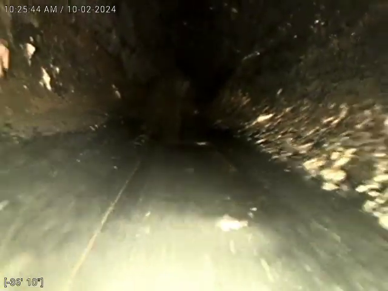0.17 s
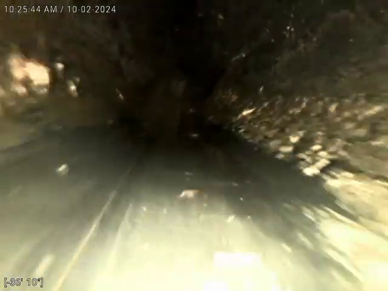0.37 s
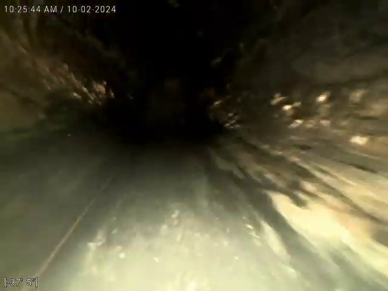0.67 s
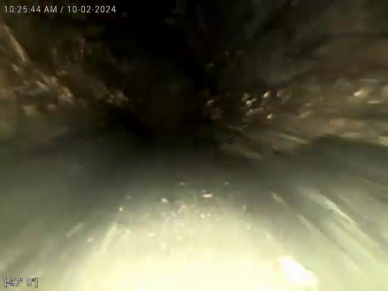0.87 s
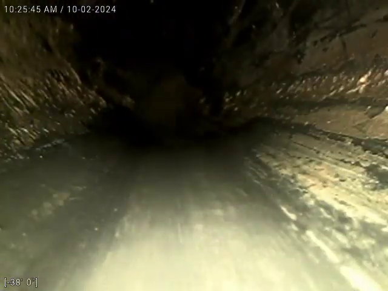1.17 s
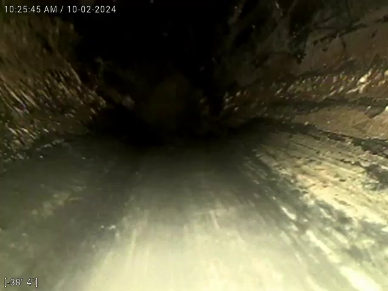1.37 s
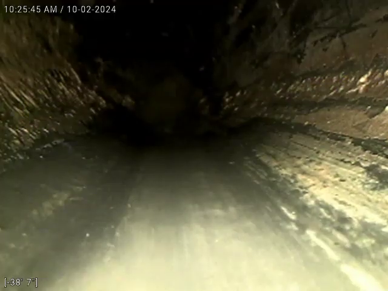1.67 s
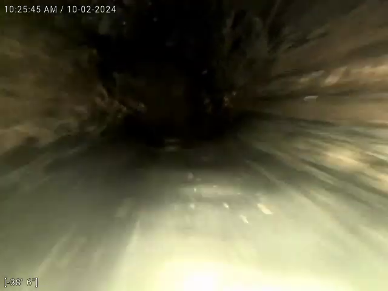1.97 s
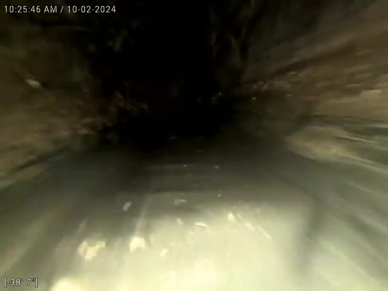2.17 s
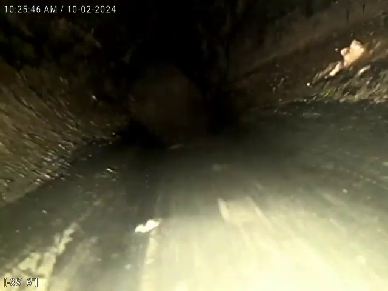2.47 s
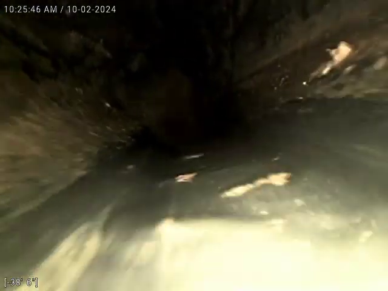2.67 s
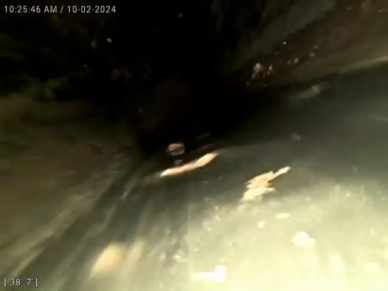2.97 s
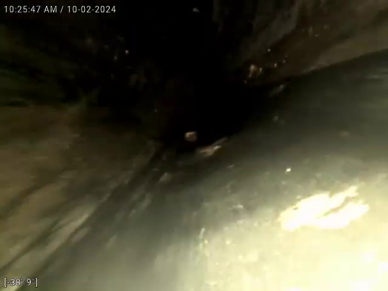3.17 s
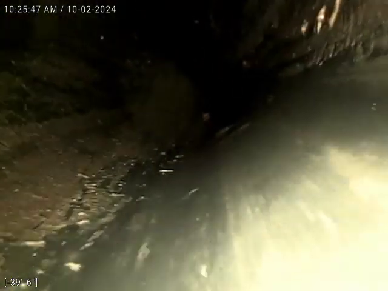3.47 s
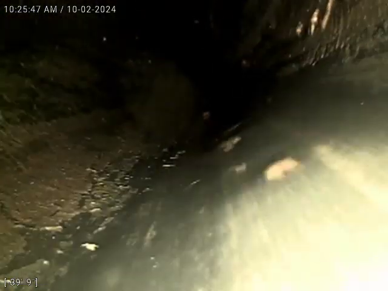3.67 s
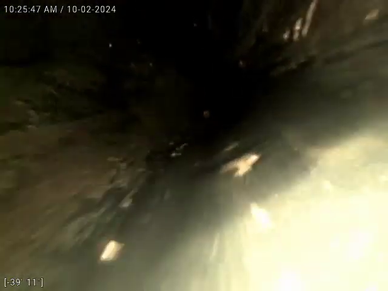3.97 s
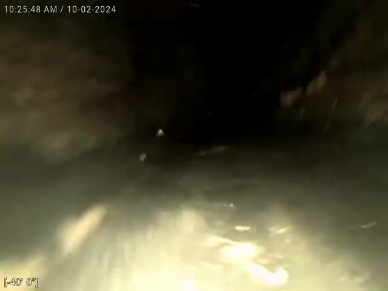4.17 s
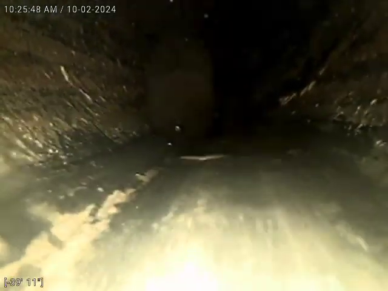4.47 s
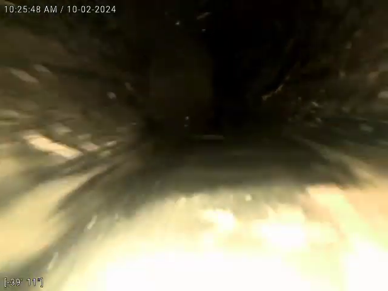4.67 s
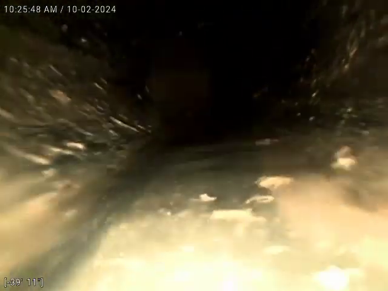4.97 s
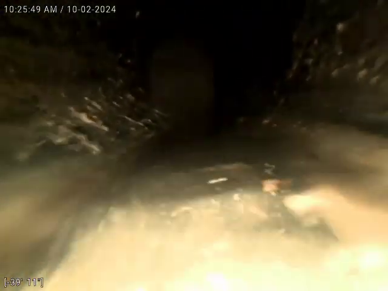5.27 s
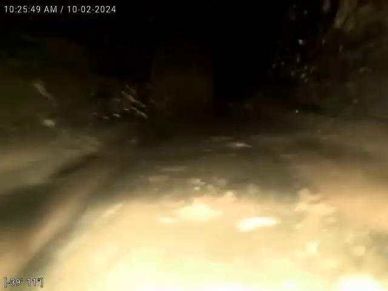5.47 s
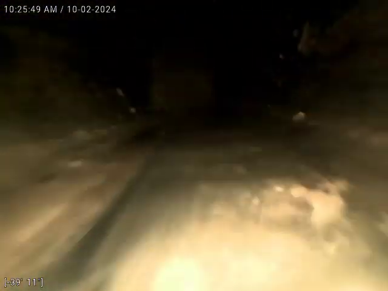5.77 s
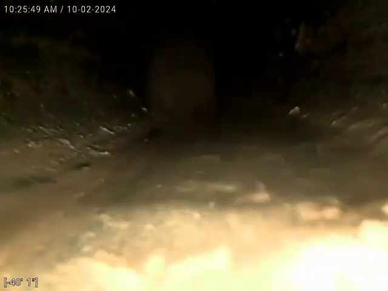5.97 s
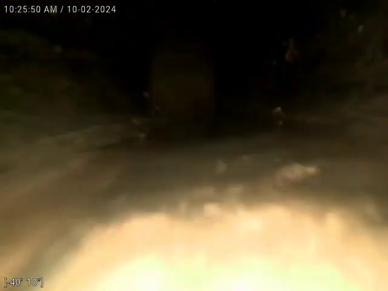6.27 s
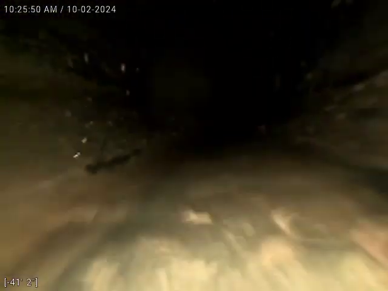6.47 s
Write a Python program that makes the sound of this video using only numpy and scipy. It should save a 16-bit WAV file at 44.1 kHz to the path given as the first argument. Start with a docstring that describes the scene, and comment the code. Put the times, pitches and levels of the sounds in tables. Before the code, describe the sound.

Heard very close and dry, cable coils rasp, tick and rumble against a hollow frame. The opening shove includes a distorted bang; a shorter shove ends in a dull knock. After smooth, breathy friction and a quick swish, grinding clatter bursts out and a long scrape with bright ticks follows. Another soft slide, a thump and short swishes give way to a final scraping push with scattered knocks, over low background hiss and hum.

```python
"""Stiff cable shoved off its reel

A stiff push cable is fed off its reel and down a drain in repeated shoves, close to one microphone.
Modulated noise makes it rasp and tick in its guide; damped modes make its coils grind and knock on the
hollow reel frame, overloading the input. Mostly between shoves, shaped noise slides with a soft hiss and
a bright swish, most likely a hand taking a new grip. Steady hiss and a faint hum lie beneath."""
import sys
import numpy as np
from scipy import signal
from scipy.fft import rfft, irfft, next_fast_len
from scipy.io import wavfile
from scipy.ndimage import map_coordinates

SR = 44100
rng = np.random.default_rng(int(sys.argv[2]) if len(sys.argv) > 2 else 0)


def materialize(psi):
    """Save the field psi as 16-bit PCM at rate SR to the path in sys.argv[1].

    A 1-D psi becomes a single channel; in a 2-D psi each row is a channel.
    """
    bounded = np.clip(np.atleast_2d(psi).T, -1, 1)
    quanta = np.round(bounded * 32767).astype(np.int16)
    wavfile.write(sys.argv[1], SR, quanta)


N = 291942


def amp(db):
    """Level to amplitude: 20 dB is a factor of ten."""
    return 10 ** (np.asarray(db) / 20)


def unit(x):
    """Power normalization: scale to rms 1."""
    return x / np.sqrt(np.mean(x ** 2) + 1e-20)


def clock():
    """Uniform sampling: the time of every sample in seconds."""
    return np.arange(N) / SR


def gain_at(points, hz):
    """Spectral envelope: interpolate (f/Hz, level/dB) over log frequency, -80 dB below the first point."""
    f, db = np.transpose(points)
    return amp(np.interp(np.log(hz + 1), np.log(f), db, left=-80))


def wobble(rate):
    """Slow random modulation: a smooth curve through rate random knots a second."""
    knots = rng.standard_normal(int(N * rate / SR) + 4)
    return map_coordinates(knots, [clock() * rate])


def filtered(x, response):
    """Linear filtering: multiply the spectrum by a response of frequency."""
    m = next_fast_len(N + SR // 2)
    return irfft(rfft(x, m) * response(np.fft.rfftfreq(m, 1 / SR)), m)[:N]


def band(x, low_hz, high_hz):
    """Band-pass filtering: keep the part of x between two edges."""
    sections = signal.butter(2, [low_hz, high_hz], "bandpass", fs=SR, output="sos")
    return signal.sosfilt(sections, x)


def coloured(x, spectrum):
    """Spectral shaping: x through a spectral envelope, at rms 1."""
    return unit(filtered(x, lambda hz: gain_at(spectrum, hz)))


def friction(rough_db, rate):
    """Stick-slip friction: noise whose strength varies as tiny contacts catch and let go."""
    return unit(rng.standard_normal(N) * amp(rough_db * wobble(rate)))


def shifting(x, patchy_db, centre_hz=None, whistle_db=0):
    """Time-varying filtering: a contact's colour drifts in patches, and one resonance may glide."""
    hz, t, z = signal.stft(x, SR, nperseg=512)
    patch = np.outer(np.hanning(11), np.hanning(25))  # frequency by time
    field = unit(signal.fftconvolve(rng.standard_normal(z.shape), patch, "same"))
    db = patchy_db * field
    if centre_hz is not None:
        offset_hz = hz[:, None] - np.interp(t, *centre_hz)
        db = db + whistle_db * np.exp(-(offset_hz / 650) ** 2)
    return signal.istft(z * amp(db), nperseg=512)[1][:N]


def catches(per_s, spread_db):
    """Random point process: single impulses at random moments, of random size."""
    size_db = spread_db * np.clip(rng.standard_normal(N), -2, 1)
    return (rng.random(N) < per_s / SR) * amp(size_db)


def progress(start, end):
    """Stroke kinematics: the elapsed share of a stroke, 0 to 1, at every sample."""
    return np.clip((clock() - start) / (end - start), 0, 1)


def held(start, end, attack_s, release_s):
    """Contact envelope: linear attack, hold and linear release of a sliding contact."""
    t = clock()
    return np.clip((t - start) / attack_s, 0, 1) * np.clip((end - t) / release_s, 0, 1)


def add(track, s, sound):
    """Superposition: mix a sound in at time s."""
    part = track[max(round(s * SR), 0):][:len(sound)]
    part += sound[:len(part)]


# steady background hiss: f/Hz, relative level per Hz/dB
HISS_SPECTRUM = [(20, -17), (45, -16), (65, -8.5), (130, -7.5), (210, -13.5), (300, -15), (600, -15.5),
                 (1000, -22.5), (2000, -25), (3200, -22.5), (5400, -23), (7400, -30.5), (11000, -34),
                 (15800, -34)]
# faint hum partials: f/Hz, relative rms level/dB
HUM_PARTIALS = [(64.6, -69), (113.0, -51.5), (193.8, -57.5), (290.7, -59.5), (387.6, -57), (667.5, -60.5)]


def floor():
    """Stationary background: shaped noise plus sine partials with slightly wandering phase."""
    hum = np.zeros(N)
    for hz, db in HUM_PARTIALS:
        phase = 2 * np.pi * hz * clock() + 0.23 * wobble(2.52)
        hum += amp(db) * np.sqrt(2) * np.sin(phase)
    hiss = coloured(rng.standard_normal(N), HISS_SPECTRUM)
    return amp(-45.5) * hiss + amp(-4.0) * hum


# slow slides: start t/s, end t/s, hiss level/dB, fine fizz level/dB, share of the stroke pressed hardest/1
SLIDE_STROKES = [(1.117, 1.612, -34.5, -42, 0.27), (1.659, 1.756, -39, -43, 0.58),
                 (3.779, 4.698, -35.5, -48, 0.32), (4.76, 4.89, -45.5, -50, 0.77)]
# soft sliding hiss: f/Hz, relative level per Hz/dB
SLIDE_SPECTRUM = [(150, 3.5), (280, -2), (430, 3), (650, -2.5), (1050, 0.5), (1650, -5), (2600, 0.5),
                  (3000, 1.5), (4700, 1.5), (5900, -3), (7200, -11), (10000, -17.5), (15000, -38)]
# fine fizz of a slide: f/Hz, relative level per Hz/dB
FIZZ_SPECTRUM = [(5000, -26), (7900, 6), (8700, -3), (9500, 2), (11000, -2.5), (13000, 0), (15500, -1)]
SLIDE_ATTACK_S, SLIDE_RELEASE_S = 0.024, 0.057
# losses in dB per stroke length away from the strongest point; the fizz peaks at this share of the stroke
SLIDE_SAG_DB, FIZZ_SAG_DB, FIZZ_PEAK = 9, 12, 0.8


def slides():
    """Sliding friction: a soft hiss follows the contact pressure, and a fine fizz peaks late in the stroke."""
    hiss, fizz = np.zeros(N), np.zeros(N)
    for start, end, hiss_db, fizz_db, firmest in SLIDE_STROKES:
        contact = held(start, end, SLIDE_ATTACK_S, SLIDE_RELEASE_S)
        u = progress(start, end)
        hiss += contact * amp(hiss_db - SLIDE_SAG_DB * np.abs(u - firmest))
        fizz += contact * amp(fizz_db - FIZZ_SAG_DB * np.abs(u - FIZZ_PEAK))
    hiss = hiss * coloured(friction(rough_db=1.04, rate=170), SLIDE_SPECTRUM)
    fizz = fizz * coloured(friction(rough_db=1.5, rate=320), FIZZ_SPECTRUM)
    return shifting(hiss + fizz, patchy_db=1.0)


# quick swishes: start t/s, end t/s, relative swish level/dB, relative fizz level/dB,
# mid-stroke swell of the fizz (negative: a dip)/dB, whistle f/Hz, mid-stroke dip of the whistle/Hz
SWISH_STROKES = [(0.578, 0.807, -36.5, -36.5, 12, 6152, 0), (1.777, 2.106, -35.5, -30, 18.5, 5650, 997),
                 (4.885, 4.95, -41, -48, 6, 5100, 0), (4.986, 5.228, -34, -40.5, -3, 5100, 1400)]
# bright swish: f/Hz, relative level per Hz/dB
SWISH_SPECTRUM = [(600, -11), (1600, -24), (2600, -10.5), (3300, -3.5), (5200, -3), (6300, -1.5),
                  (7500, -4), (9000, -12.5), (11500, -10.5), (15600, -8)]
# fine fizz of a swish: f/Hz, relative level per Hz/dB
SPRAY_SPECTRUM = [(6000, -24), (8000, 8), (10000, 10), (11500, 6), (13500, 8), (15600, 14)]
SWISH_ATTACK_S, SWISH_RELEASE_S = 0.013, 0.032
SWISH_SWELL_DB = 2  # the swish swells by this much in mid-stroke


def swishes():
    """Gliding resonance in friction noise: quick bright slips swell in mid-stroke; a breezy peak may dip."""
    hiss, fizz, glide = np.zeros(N), np.zeros(N), []
    for start, end, db, fizz_db, swell_db, hz, dip_hz in SWISH_STROKES:
        contact = held(start, end, SWISH_ATTACK_S, SWISH_RELEASE_S)
        slack = 1 - np.sin(np.pi * progress(start, end))
        hiss += contact * amp(db - SWISH_SWELL_DB * slack)
        fizz += contact * amp(fizz_db - swell_db * slack)
        glide += [(start, hz), ((start + end) / 2, hz - dip_hz), (end, hz)]
    grain = coloured(friction(rough_db=1.74, rate=170), SWISH_SPECTRUM)
    hiss = hiss * amp(1.8 * wobble(28.04)) * grain
    fizz = fizz * coloured(friction(rough_db=1.8, rate=130), SPRAY_SPECTRUM)
    breezy = shifting(hiss, patchy_db=1.5, centre_hz=np.transpose(glide), whistle_db=6.0)
    fine = shifting(fizz, patchy_db=1.8)
    return amp(-0.45) * breezy + amp(2.0) * fine


# modes of the hollow reel frame: nominal f/Hz, relative level/dB, decay time t60/s
FRAME_MODES = [(117, -31, 0.83), (195, -25.5, 0.28), (252.1, -0.5, 0.1), (304.5, 0, 0.032),
               (446.4, -2, 0.15), (530, -7, 0.046), (698, -15, 0.034), (768.4, -14.5, 0.057),
               (1030, -8, 0.0057)]


def frame_ring(hardness_db, scatter_db, detune=0.018):
    """Modal impulse response: damped frame modes after one blow; a harder blow favours the higher ones."""
    t = np.arange(SR // 2) / SR
    hz, db, t60 = np.transpose(FRAME_MODES)[:, :, None]
    hz = hz * (1 + detune * rng.standard_normal(hz.shape))  # the coil presses on a new spot each time
    tilt = hardness_db * np.clip(np.log2(hz / 335), -.5, .5)
    level = db + tilt + scatter_db * rng.standard_normal(hz.shape)
    modes = amp(level - 60 * t / t60) * np.sin(2 * np.pi * hz * t)
    build_up = 1 - np.exp(-t * hz)  # each mode takes about a cycle
    sign = (-1) ** np.arange(len(FRAME_MODES))  # neighbouring modes move against each other at the contact
    return sign @ (modes * build_up)


def through_frame(force, hardness_db):
    """Convolution with a modal response: a continuous force keeps the frame's modes ringing."""
    ring = frame_ring(hardness_db, scatter_db=5.0)
    return signal.fftconvolve(force, ring / np.linalg.norm(ring))[:len(force)]


# stiff bending resonances of coil and cage: f/Hz, nominal width/Hz, relative level/dB
CAGE_MODES = [(713, 50, 23.5), (827, 52, 3), (1070, 13, 3), (1450, 30, 13), (1400, 13, 6), (1930, 13, 3),
              (2380, 73, 11), (2543, 16, 8), (2780, 53, 7.5), (2950, 43, -8.5), (3100, 320, 6.5),
              (3680, 40, 8.5), (4000, 42, -42), (4450, 36, -4), (4740, 200, 0.5), (5798, 124, 11.5),
              (5800, 15, -15)]
# broad crack: f/Hz, relative level/dB
CRACK_SPECTRUM = [(150, -16), (600, 5), (1500, 3.5), (3200, 4), (5500, -1.5), (7500, -14), (11000, -23),
                  (16000, -23)]


def through_cage(force, crack_db):
    """Parallel resonators: a force heard as a broad crack plus the cage's short ring, at unit mean power gain."""
    def response(f):
        ring = 0
        for k, (centre, width, db) in enumerate(CAGE_MODES):
            damping = 1j * f * max(width, 65)
            ring = ring + (-1) ** k * amp(db) * damping / (centre * centre - f * f + damping)
        h = ring + amp(crack_db) * gain_at(CRACK_SPECTRUM, f)
        return h / np.sqrt(np.mean(np.abs(h) ** 2))
    return filtered(force, response)


def bundle(count):
    """Heavily damped body: the dull, pitchless shudder of the wound cable as band noise, at rms 1."""
    return unit(band(rng.standard_normal(count), low_hz=215, high_hz=562))


# shoves of the cable: start t/s, fastest t/s, end t/s, relative rasp level/dB, relative frame rumble level/dB
SHOVE_STROKES = [(-.35, .03, 0.63, -35, -37.5), (0.792, 0.956, 1.13, -39, -37.5),
                 (2.54, 3.065, 3.733, -34.5, -36.5), (4.198, 4.34, 4.62, -54, -43),
                 (5.3, 5.726, 6.63, -35.5, -35.5)]
RASP_POWER, RUMBLE_POWER = 0.74, 0.49  # amplitude grows as this power of the speed


def feed():
    """Speed-dependent friction: rasp and rumble follow the cable's speed, one arch a shove."""
    rasp, rumble = np.zeros(N), np.zeros(N)
    for start, fastest, end, rasp_db, rumble_db in SHOVE_STROKES:
        speed = np.sin(np.pi / 2 * np.interp(clock(), [start, fastest, end], [0, 1, 0]))
        rasp += amp(rasp_db) * speed ** RASP_POWER
        rumble += amp(rumble_db) * speed ** RUMBLE_POWER
    return rasp, rumble


# rasp of the cable in its guide: f/Hz, relative level per Hz/dB
RASP_SPECTRUM = [(300, 2), (750, -9.5), (1100, -4), (1700, -7), (2350, 2), (3100, -4.5), (3800, -8.5),
                 (4900, 2.5), (6200, -1.5), (7200, -4), (8800, -9), (11000, -11.5), (15500, -10)]
SMALL_BUMPS_PER_S, SMALL_BUMP_DB = 9.1, -3  # loose coils nudging the frame; level against the rumble


def shoves():
    """Friction-driven vibration: the running cable rasps, stirs the cage, and rumbles and bumps the frame."""
    rasp, rumble = feed()
    rasp = rasp * amp(0.8 * wobble(16))  # the feed surges a little
    drag_spectrum = [(60, -22), (115, 13.5), (180, 18.0), (260, -4.0), (350, -0.5), (450, -6.0),
                     (800, -3.5), (2000, -21)]  # f/Hz, relative level per Hz/dB
    drag = coloured(friction(rough_db=2.5, rate=32), drag_spectrum)
    body = unit(through_frame(drag, hardness_db=-1.5))
    nudges = rumble * catches(SMALL_BUMPS_PER_S, spread_db=5)
    bumps = signal.fftconvolve(nudges, frame_ring(hardness_db=2.5, scatter_db=7.0))[:N]
    grit = shifting(coloured(friction(rough_db=1.5, rate=670), RASP_SPECTRUM), patchy_db=3.0)
    scrape = band(friction(rough_db=6.5, rate=280), low_hz=1960, high_hz=9700)
    cage = unit(through_cage(scrape, crack_db=-39))
    frame = amp(-2.5) * rumble * body + amp(SMALL_BUMP_DB) * bumps
    return frame + rasp * (amp(-1.25) * grit + amp(-8.0) * cage)


# sharpest ticks of the cable in its guide: t/s, relative level/dB
SHARP_TICKS = [(0.1228, -17), (.26, -19.5), (0.5227, -19), (0.8145, -23.5), (2.7563, -17), (2.819, -20.5),
               (2.972, -16), (3.1108, -21), (3.4398, -19), (3.9057, -24.5), (3.9402, -23), (4.008, -19.5),
               (4.1574, -25.5), (5.809, -13), (6.2264, -25)]
# bright snap: f/Hz, relative level per Hz/dB
TICK_SPECTRUM = [(700, -27), (2400, -11), (4000, -6.5), (6500, -1.5), (9000, -6), (12000, -15.5),
                 (16000, -11)]
SMALL_TICKS_PER_S = 51  # mean rate of faint ticks, scaled by the rasp


def ticks():
    """Impulsive stick-slip: bright snaps as the cable catches in its guide, faint ones whenever it runs."""
    rasp, _ = feed()
    snaps = rasp * catches(SMALL_TICKS_PER_S, spread_db=8.5)
    for s, db in SHARP_TICKS:
        add(snaps, s, amp([db]))
    t = np.arange(SR // 10) / SR
    fading = signal.fftconvolve(snaps, amp(-60 * t / 0.039))[:N]  # t60 0.039 s
    return amp(-7.5) * fading * coloured(friction(rough_db=-3.0, rate=1600), TICK_SPECTRUM)


# coils grinding along the frame: peak t/s, relative groan level/dB, hardness/(dB/octave),
# relative grit level/dB, time constant of swell and release/s
COIL_GRINDS = [(0.161, -14.5, 4, -22, 0.024), (1.099, -14, -5, -24, 0.0098),
               (2.122, -18.5, -24, -37.5, 0.013), (2.261, -25, -8, -57, 0.019),
               (2.303, -15, -8, -35, 0.0042), (2.329, -8, 7, -14, .016), (2.436, -20, 6, -39, 0.0059),
               (2.467, -13, 3, -16, 0.016), (2.548, -9, 5, -21.5, .012), (2.763, -23, 3, -36, 0.015),
               (2.814, -21.5, -2.5, -51, 0.018), (5.709, -15, 6, -20, 0.011), (5.987, -16, -10, -30, 0.019),
               (6.367, -25, -9, -40, 0.04)]


def grinds():
    """Forced vibration by friction: a coil drags over the frame with growing pressure, then lets go."""
    groan, grit, t = np.zeros(N), np.zeros(N), clock()
    drag = friction(rough_db=1.5, rate=610)
    for s, groan_db, hardness_db, grit_db, swell in COIL_GRINDS:
        near = np.abs(t - s) < .3
        pressure = np.exp(-np.abs(t[near] - s) / swell)
        ringing = through_frame(pressure * drag[near], hardness_db)
        shudder = amp(-5) * pressure * bundle(len(pressure))
        groan[near] += amp(groan_db) * (ringing + shudder)
        grit[near] += amp(grit_db) * pressure
    scrape = through_cage(grit * friction(rough_db=1.0, rate=500), crack_db=12)
    return amp(-2.96) * groan + amp(-1.5) * scrape


# coils striking the frame: t/s, relative thud level/dB, hardness/(dB/octave), relative clack level/dB,
# clack centre f/Hz, relative sharp crack level/dB
COIL_KNOCKS = [(0.1483, -12, 16, 12.5, 2560, -4), (.157, 1, 15, -7, 1300, 16),
               (.17, 12, 10.5, 12, 1180, 19), (.24, -19, -18, -9.5, 1390, -19.5),
               (.725, -20.5, -2, -24, 970, -30), (1.0975, -2, -13, 4.5, 780, 3.5),
               (1.793, -29.5, -15, -38, 600, -52), (2.124, -25, 0, -26, 700, -46),
               (2.16, -40, 0, -25, 1170, -32), (2.321, -9.5, 8, 0, 854, -29),
               (2.3581, -10, -8, -3, 900, -1), (2.383, -12, 4, -19, 1000, -24),
               (2.462, -31, -5, -18, 1300, -8.5), (2.526, -24, 15, -12, 1410, -13),
               (2.548, -18.5, -4, -7.5, 960, -3.5), (2.573, -22, 5, -17.5, 920, -22.5),
               (2.736, -16.5, 2, -20, 750, -39), (2.79, -15, -7, -30, 755, -42),
               (2.899, -36, 12, -29, 750, -46), (3.379, -8.5, -4, 4, 1700, -16.5),
               (3.401, -20, -1, -13.5, 1200, -22), (3.521, -21.5, -3, -26.5, 920, -40),
               (3.651, -35, 9, -57, 700, -41), (4.062, -36.5, -26, -52, 610, -58),
               (4.859, -15, -2, -7, 620, -24), (4.87, -10.5, 0.5, -23, 650, -49),
               (5.321, -27, 0, -27.5, 800, -44), (5.689, -17.5, -3, -4.5, 1350, -24),
               (5.704, -14, -12, -9.5, 750, -29), (5.9829, -9.5, -3.5, -4, 755, -0.5),
               (6.348, -26, -5, -17, 1112, -13), (6.37, -22, -2, -16, 960, -10)]
# t60 of the chatter at clack level 0 dB; it doubles per so many dB less, as a lighter blow seats more slowly
CHATTER_T60_S, CHATTER_DOUBLES_DB = 0.037, 78
SHUDDER_DB, SHUDDER_T60_S = -5.5, 0.096  # the wound cable shudders with each blow; level against the thud


def knocks():
    """Impact excitation: each blow rings the frame while the coil chatters on the cage, hollow and cracking."""
    thuds, clacks, crack = np.zeros(N), np.zeros(N), np.zeros(N)
    t = np.arange(SR // 2) / SR
    for s, thud_db, hardness_db, clack_db, clack_hz, crack_db in COIL_KNOCKS:
        t60 = CHATTER_T60_S * 2 ** (-clack_db / CHATTER_DOUBLES_DB)
        chatter = amp(-60 * t / t60) * (1 - np.exp(-t / 0.00072))
        hollow = unit(band(rng.standard_normal(len(t)), clack_hz / 1.63, clack_hz * 1.66))
        shudder_decay = amp(SHUDDER_DB - 60 * t / SHUDDER_T60_S) * (1 - np.exp(-t / 0.0033))
        shudder = shudder_decay * bundle(len(t))
        add(thuds, s, amp(thud_db) * (frame_ring(hardness_db, scatter_db=1.5) + shudder))
        add(clacks, s, amp(clack_db) * chatter * hollow)
        add(crack, s, amp(crack_db) * chatter)
    sharp = band(crack * friction(rough_db=5, rate=660), low_hz=2080, high_hz=17000)
    cage_force = amp(-16.0) * clacks + amp(-0.5) * sharp
    return amp(-3.5) * thuds + through_cage(cage_force, crack_db=5.5)


def scene():
    """Superposition of all sources: one microphone feeds both channels."""
    mono = floor() + slides() + swishes() + shoves() + ticks() + grinds() + knocks()
    return np.array([mono, mono])


TOP_HZ = 15900  # upper band limit


def record(dry):
    """Overload and band limiting: the input clips at full scale, then all above the top edge is removed."""
    clipped = np.clip(dry, -1, 1)
    return np.array([filtered(channel, lambda hz: hz < TOP_HZ) for channel in clipped])


dry = scene()
out = record(dry)
materialize(out)
```